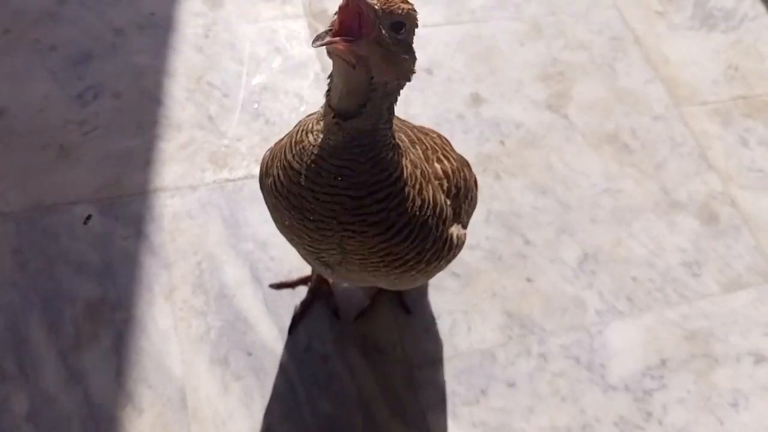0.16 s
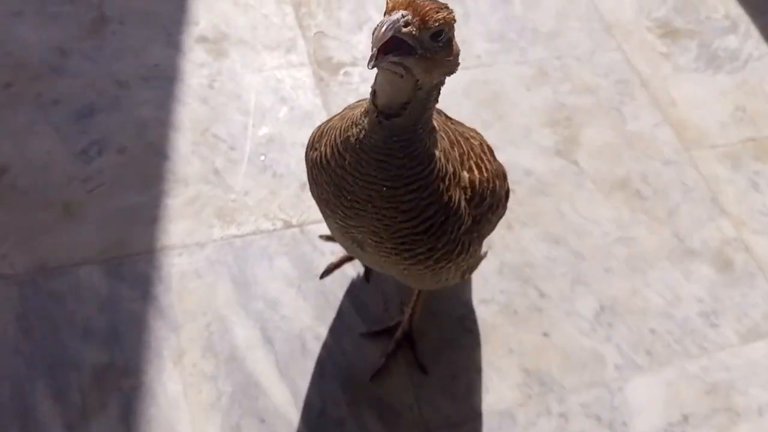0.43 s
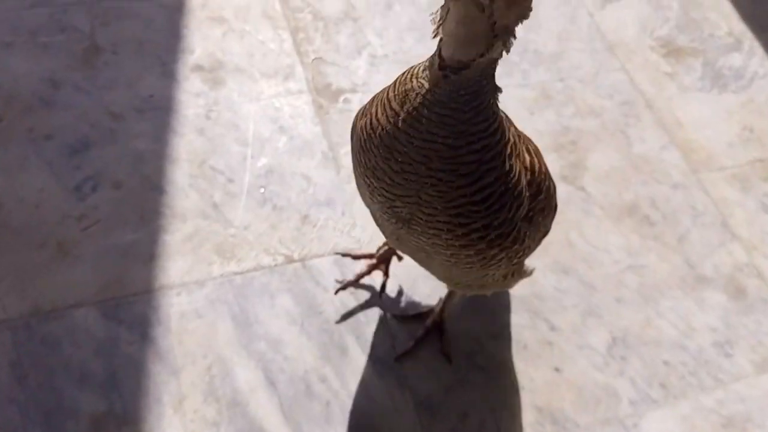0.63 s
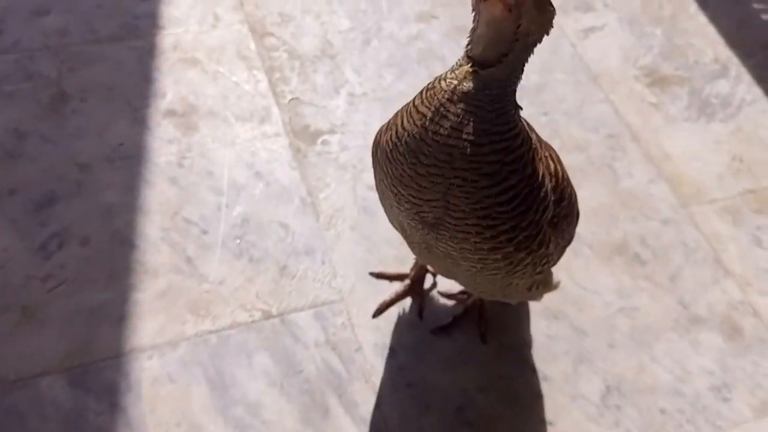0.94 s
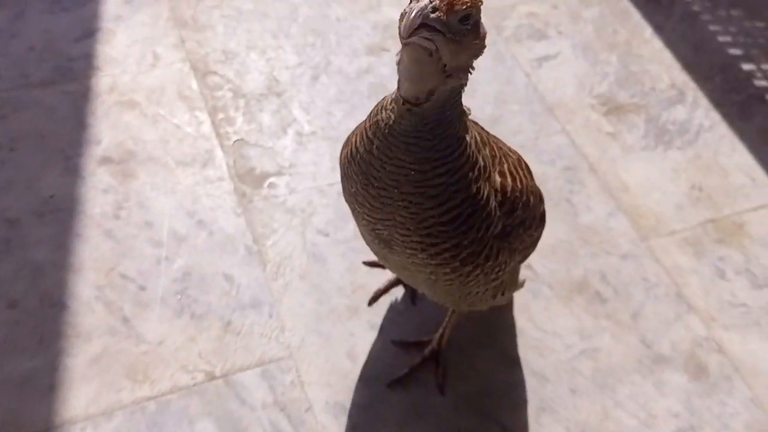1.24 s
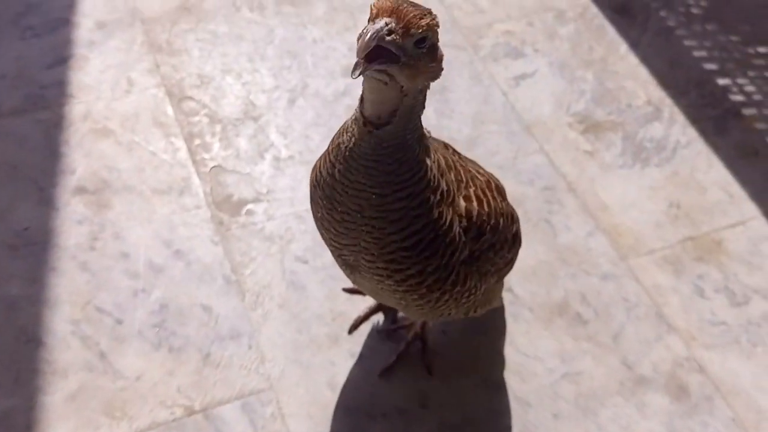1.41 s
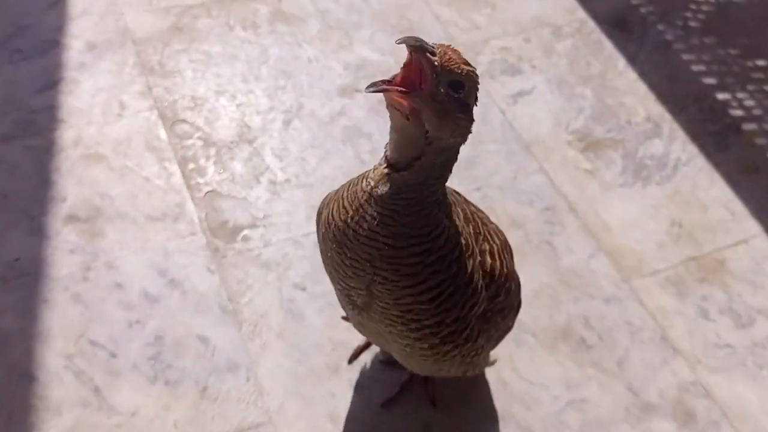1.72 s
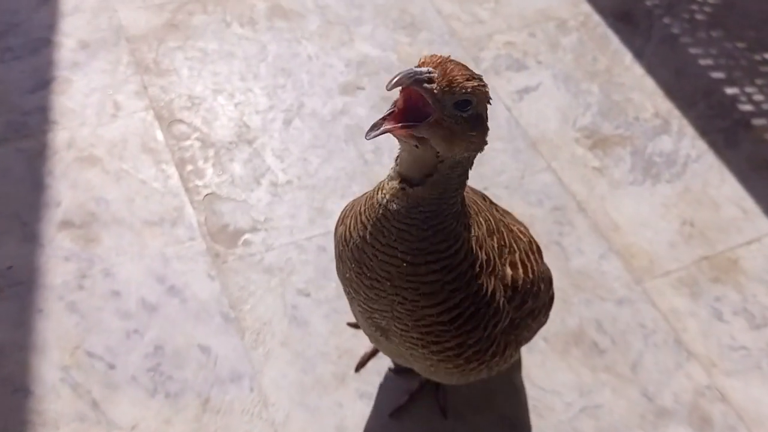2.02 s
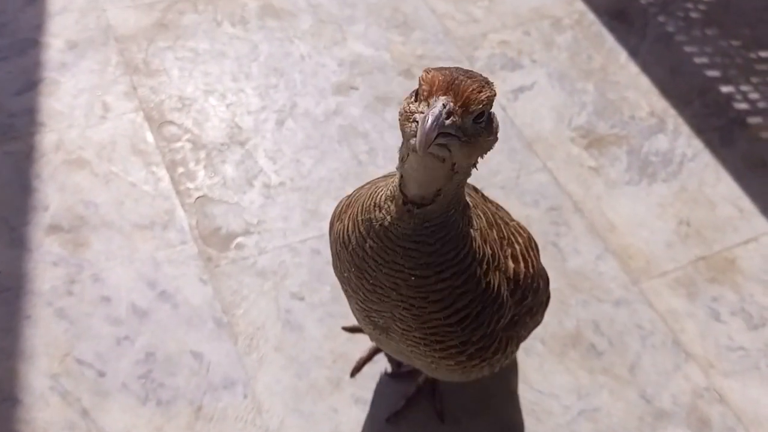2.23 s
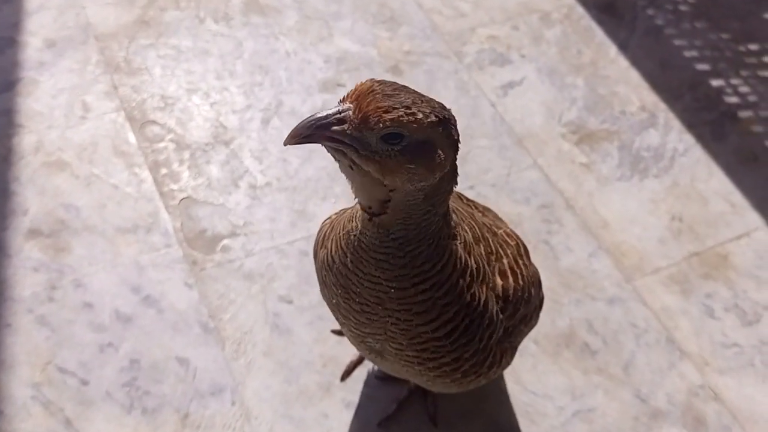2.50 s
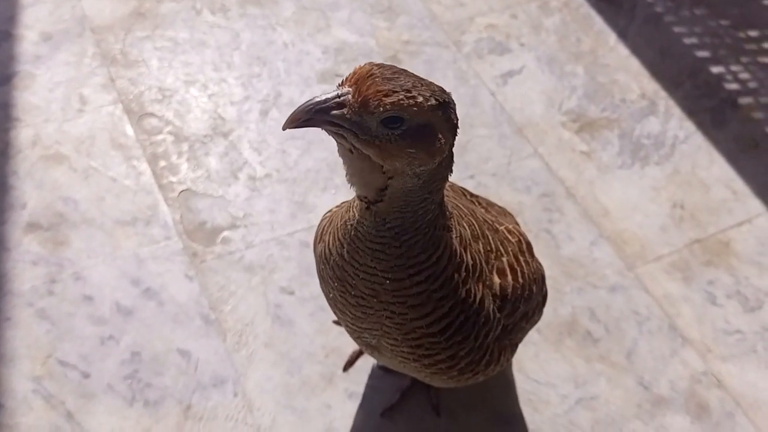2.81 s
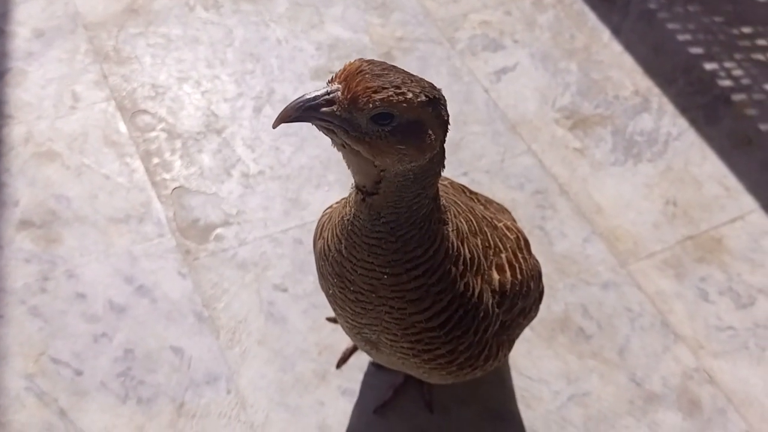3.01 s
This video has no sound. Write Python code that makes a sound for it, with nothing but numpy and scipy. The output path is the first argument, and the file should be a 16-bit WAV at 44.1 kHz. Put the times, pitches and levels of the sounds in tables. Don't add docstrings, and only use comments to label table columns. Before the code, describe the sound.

Close game bird gives shrill raspy falling whistles and clucking runs, echoing off hard walls.

```python
import sys
import numpy as np
from scipy import signal
from scipy.fft import rfft, irfft
from scipy.io import wavfile
from scipy.ndimage import uniform_filter1d

SR = 44100
rng = np.random.default_rng(int(sys.argv[2]) if len(sys.argv) > 2 else 0)


def gain_from_db(level_db):
    decades = np.asarray(level_db, float) / 20
    return 10 ** decades


def master(y):
    cut = np.clip(np.atleast_2d(y).T, -1, 1)
    pcm = np.round(cut * 32767)
    wavfile.write(sys.argv[1], SR, pcm.astype(np.int16))


N = 138915


def at_hz(points, hz, column=1):
    table = np.array(points)
    return np.interp(np.log(hz), np.log(table[:, 0]), table[:, column])


def coloured(spectrum, size):
    hz = np.maximum(np.arange(size // 2 + 1) * SR / size, 10)
    x = irfft(rfft(rng.standard_normal(size)) * gain_from_db(at_hz(spectrum, hz)), size)
    return x / x.std()


def wobble(size, hz):
    knots = np.clip(rng.standard_normal(200), -2, 2)
    return np.interp(np.arange(size) * hz / SR, np.arange(200), knots)


def add(out, s, x):
    i = int(s * SR)
    out[i:i + len(x)] += x


def shape(length_s, swell_db):
    attack_s, release_s = 0.0025, 0.004
    t = np.arange(int(length_s * SR)) / SR
    u = t / length_s
    edge = np.clip(t / attack_s, 0, 1) * np.clip((length_s - t) / release_s, 0, 1)
    return u, np.sin(np.pi / 2 * edge) ** 2 * gain_from_db(swell_db * (u - .5))


# frequency in Hz, level in dB.
THROAT_COLOUR = [(400, -2.5), (1000, -7), (1900, 7), (3200, -10), (5600, -1.5), (7500, -19), (11000, -32),
                 (16000, -45)]


def voice(hz, odd_db, tilt_db, jitter, shimmer_db, dull_db=0, throat=THROAT_COLOUR):
    phase = 2 * np.pi * np.cumsum(hz * (1 + jitter * wobble(len(hz), 900))) / SR
    k = np.arange(1, 33)[:, None]
    level_db = at_hz(throat, k * hz) + (tilt_db + dull_db) * np.log2(k) + odd_db * (k % 2)
    gain = gain_from_db(level_db) * (k * hz < 16300)
    drift = np.array([wobble(len(hz), 200) for _ in k])
    flicker = gain_from_db(np.clip(shimmer_db, 0, 5) * np.minimum(k * hz / 3000, 1) * drift)
    rms = np.sqrt(np.mean(np.sum(gain ** 2, axis=0)) / 2)
    return np.sum(gain * flicker * np.sin(k * phase + k * k), axis=0) / rms


def whistle(hz, dying, jitter, shimmer_db, dull_db=0):
    return voice(hz / 2, -24 + 9.5 * dying, 4.5, jitter, shimmer_db, dull_db)


def snap(breath, s, db):
    add(breath, s, gain_from_db(db - 5) * np.hanning(int(2 * SNAP_S * SR)))


SNAP_S = 0.0065


# frequency in Hz, level in dB per Hz.
FLOOR_COLOUR = [(20, -9.5), (80, -5), (250, -17), (1200, -17.5), (1900, -7), (3000, -11.5), (4000, -19),
                (16000, -49)]


def surroundings():
    floor_db = -77
    coo_s, coo_length_s, coo_hz, coo_db = 0.0, 0.09, 527, -80
    puff_s, puff_length_s, puff_hz, puff_db = 2.17, 0.057, 110, -56
    out = gain_from_db(floor_db) * coloured(FLOOR_COLOUR, N)
    t = np.arange(int(coo_length_s * SR)) / SR
    add(out, coo_s, gain_from_db(coo_db) * np.hanning(len(t)) ** .5 * np.sin(2 * np.pi * coo_hz * t))
    puff_colour = [(20, -8), (puff_hz, 0), (1.4 * puff_hz, -25), (1000, -70)]
    puff = coloured(puff_colour, int(puff_length_s * SR))
    add(out, puff_s, gain_from_db(puff_db) * np.hanning(len(puff)) * puff)
    return out


# frequency in Hz, level in dB per Hz.
BREATH_COLOUR = [(500, -36), (1200, -30), (2200, -2), (3600, 0), (5600, 7.5), (7500, -10.5), (11000, -18.5),
                 (16000, -33)]


def breath_hiss():
    return coloured(BREATH_COLOUR, N)


# frequency in Hz, level in dB.
SHUT_BEAK = [(400, -27), (1000, -11), (1600, 0), (2600, -18), (4000, -26), (5600, -13), (7500, -30),
             (16000, -50)]
# start in seconds, length in seconds, first and last pitch in Hz, level in dB.
CHUCK_SLIDES = [
    (0.057, .036, 552, 1007, -27),
    (0.166, 0.041, 478.8, 947, -27.5),
    (0.843, 0.035, 598, 1090, -29),
    (1.257, .040, 648.5, 1090, -27.5),
    (1.373, .033, 500, 971, -27.5),
    (1.492, 0.026, 526, 1059, -29),
    (2.392, 0.036, 606, 1013, -29),
    (2.508, 0.03, 524.5, 994, -26.5),
    (2.623, 0.033, 492.5, 1145, -27),
]
# start in seconds, length in seconds, first and last pitch in Hz,
# level in dB.
CHUCK_DROPS = [
    (0.087, .028, 1949, 1262, -18),
    (0.878, 0.032, 2102, 1462, -16),
    (1.298, 0.028, 2052, 1423, -15),
    (1.411, 0.024, 1972, 1316, -16.5),
    (1.523, 0.025, 1718, 1297, -17),
    (2.426, 0.027, 2002, 1310, -16.5),
    (2.541, 0.02, 1891, 1285, -16),
    (2.657, 0.025, 1952, 1197, -24.5),
]


def chucks(hiss):
    out, breath = np.zeros(N), np.zeros(N)
    for s, length, start, end, db in CHUCK_SLIDES:
        u, env = shape(length, 4.8)
        pitch = end - (end - start) * (1 - u) ** 1.6
        tone = voice(pitch, 0, 1, jitter=.045, shimmer_db=5, dull_db=-4 * (1 - u) ** 2, throat=SHUT_BEAK)
        add(out, s, gain_from_db(db) * env * np.clip(u / .3, 0, 1) * tone)
        add(breath, s, gain_from_db(db - 1.5) * env * u * gain_from_db(3 * wobble(len(u), 300)))
    for s, length, start, end, db in CHUCK_DROPS:
        u, env = shape(length, 7.5)
        pitch = start - (start - end) * u ** 1.2
        dull_db = -9 * u ** 0.78 - 0.79 * (2200 - start) / 100
        add(out, s, gain_from_db(db) * env * whistle(pitch, u ** 4, jitter=0.014, shimmer_db=4.0, dull_db=dull_db))
        snap(breath, s - SNAP_S, db)
    return out + breath * hiss


# frequency in Hz, time to die by 60 dB in seconds, level in dB.
WALL_ECHO = [(400, 0.97, -8.5), (1120, 0.67, -2), (2200, 0.93, 5.5), (4400, 0.91, -6), (8400, 0.44, -1.5),
             (16000, .25, 1)]


def walls(x):
    wet_db, first_echo_s, build_s = -4, 0.002, 0.013
    grain_db, grain_hz, smooths_s = 3.5, 190, 0.08
    size, edges = SR, 250 * 2 ** np.arange(0, 6.3, .5)
    t = np.arange(size) / SR
    white = rng.standard_normal((2, size))
    answer = 0
    for k, (low, high) in enumerate(zip(edges, edges[1:])):
        hz = np.sqrt(low * high)
        band = signal.sosfilt(signal.butter(2, [low, high], "band", fs=SR, output="sos"), white[k % 2])
        t60 = at_hz(WALL_ECHO, hz)
        decay = gain_from_db(at_hz(WALL_ECHO, hz, column=2) - 60 * t / t60)
        answer = answer + band * decay / np.sqrt(t60 * SR / 14)
    build = np.clip((t - first_echo_s) / build_s, 0, 1)
    grain = gain_from_db(grain_db * np.exp(-t / smooths_s) * wobble(size, grain_hz))
    return gain_from_db(wet_db) * signal.fftconvolve(x, answer * build * grain)[:N]


# start in seconds, length in seconds, pitch in Hz, level in dB.
CALL_RASPS = [
    (0.253, 0.048, 1184, -24),
    (0.586, 0.042, 1272, -21.5),
    (0.992, 0.042, 1293, -23),
    (1.746, .048, 985, -23.5),
    (2.139, 0.034, 1276, -22),
]


def rasps(hiss):
    settles_hz, break_db = 1123.8, -6
    out, breath = np.zeros(N), np.zeros(N)
    for s, length, hz, db in CALL_RASPS:
        u, env = shape(length, 0)
        arch = hz * (1 - 0.0945 * np.clip((u - .17) / 0.1825, -1, 1) ** 2)
        settled = np.clip((u - .4) / 0.179, 0, 1)
        broken = np.sin(np.pi * np.clip((u - .25) / 0.51, 0, 1))
        pitch = arch + (settles_hz - arch) * settled
        burst_db = 3.5 * np.exp(-((u - .25) / 0.1) ** 2)
        tone = voice(pitch / 2, -26 + 15 * broken, 3.5, jitter=.014 + .05 * broken, shimmer_db=5)
        add(out, s, gain_from_db(db + break_db * broken + burst_db) * env * tone)
        add(breath, s, gain_from_db(db - 7 + 4 * broken) * env * gain_from_db(2.5 * wobble(len(u), 400)))
    return out + breath * hiss


# start in seconds, length in seconds, pitch in Hz, level in dB.
HELD_WHISTLES = [
    (.300, 0.015, 2192, -15),
    (.632, .018, 2200, -14.5),
    (1.039, 0.023, 2200, -15),
    (1.792, .020, 2199, -16),
    (2.18, 0.019, 2200, -13.5),
]
# start in seconds, length in seconds, first and last pitch in Hz, level in dB.
FALLING_WHISTLES = [
    (0.336, 0.063, 2143, 1683, -17.5),
    (.672, 0.056, 2160, 1656, -16.5),
    (1.084, 0.061, 2152, 1620, -18.5),
    (1.837, .057, 2163, 1592, -17),
    (2.221, 0.057, 2177, 1614, -17),
]


def long_calls(hiss):
    out, breath = np.zeros(N), np.zeros(N)
    for (s, length, hz, db), fall in zip(HELD_WHISTLES, FALLING_WHISTLES):
        u, env = shape(length, 0)
        pitch = hz * (1 - 0.011 * u - 0.04 * u ** 9)
        add(out, s, gain_from_db(db) * env * whistle(pitch, u ** 6, jitter=.003, shimmer_db=.7))
        for at in (s - SNAP_S, s + length - SNAP_S / 2, fall[0] - SNAP_S):
            snap(breath, at, db)
        gap_s = fall[0] - s - length
        add(breath, s + length, gain_from_db(db - 30.5) * np.ones(int(gap_s * SR)))
    for s, length, start, end, db in FALLING_WHISTLES:
        u, env = shape(length, 2.5)
        pitch = start - (start - end) * u ** 2.3
        tone = whistle(pitch, u ** 4, jitter=0.0024, shimmer_db=3.53, dull_db=-6.5 * u ** 1.65)
        add(out, s, gain_from_db(db) * env * tone)
    return out + breath * hiss


# start in seconds, length in seconds, start pitch in Hz, top pitch in Hz, level in dB.
LOW_CROAKS = [
    (1.614, .052, 251, 513.7, -26),
    (2.06, 0.018, 345, 374, -37),
    (2.735, .050, 239.2, 451.5, -27.5),
    (2.868, 0.044, 436, 540.7, -34),
]


def croaks():
    top_at, sag = .6, .2
    out = np.zeros(N)
    for s, length, start, top, db in LOW_CROAKS:
        u, env = shape(length, 0)
        before = np.clip(1 - u / top_at, 0, 1)
        after = np.clip((u - top_at) / (1 - top_at), 0, 1)
        pitch = top - (top - start) * before ** 1.6 - sag * top * after ** 2
        odd_db = -22 * np.clip((1 - pitch / top - .1) / .1, 0, 1) * (u < top_at)
        swell = gain_from_db(-16 * before ** 2.25 - 7.9 * after ** 0.89)
        dull_db = -4 * (before + after)
        tone = voice(pitch, odd_db, 0, jitter=.02, shimmer_db=5, dull_db=dull_db, throat=SHUT_BEAK)
        add(out, s, gain_from_db(db) * env * swell * tone)
    return out


# frequency in Hz, threshold in dB.
SUPPRESSOR_THRESHOLD = [(300, -87), (1200, -72), (2200, -54.5), (4000, -62), (8000, -71), (16000, -76.5)]


def suppressor(x):
    quiet_db, depth_db = -40, -22
    hz, _, bins = signal.stft(x, SR, nperseg=512)
    power = uniform_filter1d(np.abs(bins) ** 2, size=7, axis=0)
    power = uniform_filter1d(power, size=3, axis=1)
    over = power / gain_from_db(2 * at_hz(SUPPRESSOR_THRESHOLD, np.maximum(hz, 10)))[:, None]
    loud = power.sum(axis=0) / gain_from_db(2 * quiet_db)
    gain = np.maximum(over / (1 + over) * np.sqrt(loud / (1 + loud)), gain_from_db(depth_db))
    return signal.istft(bins * gain, SR, nperseg=512)[1][:N]


def scene():
    cut_s, fade_s = 0.1085, 0.0001
    hiss = breath_hiss()
    bird = chucks(hiss) + rasps(hiss) + long_calls(hiss) + croaks()
    heard = (bird + walls(bird)) * np.clip((np.arange(N) / SR - cut_s) / fade_s, 0, 1)
    return (suppressor(heard) + surroundings())[None]


def band_limit(x):
    return signal.sosfilt(signal.butter(12, 16820, fs=SR, output="sos"), x)


def record(dry):
    return band_limit(dry)


dry = scene()
out = record(dry)
master(out)
```